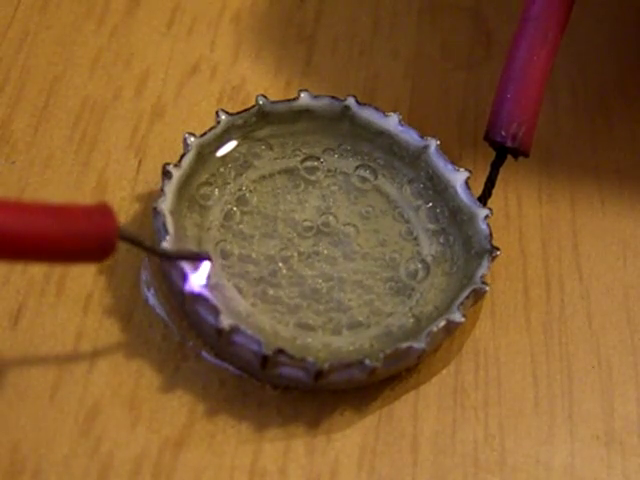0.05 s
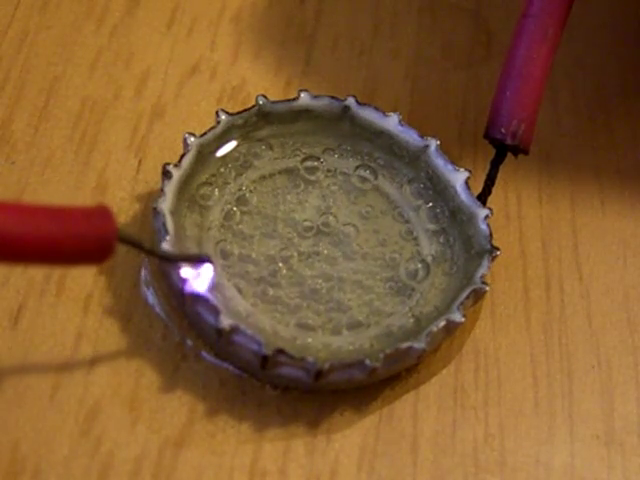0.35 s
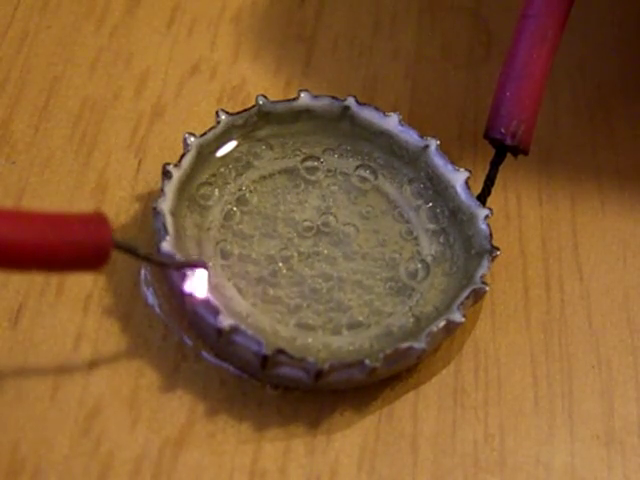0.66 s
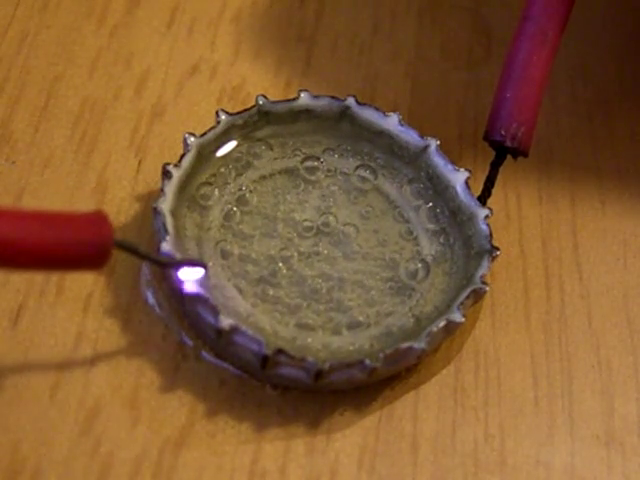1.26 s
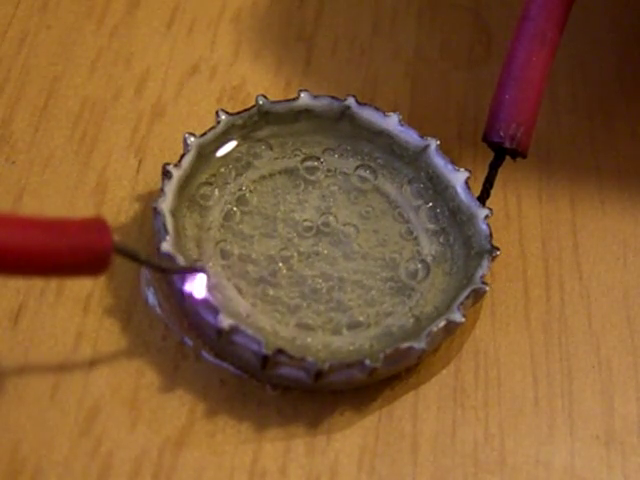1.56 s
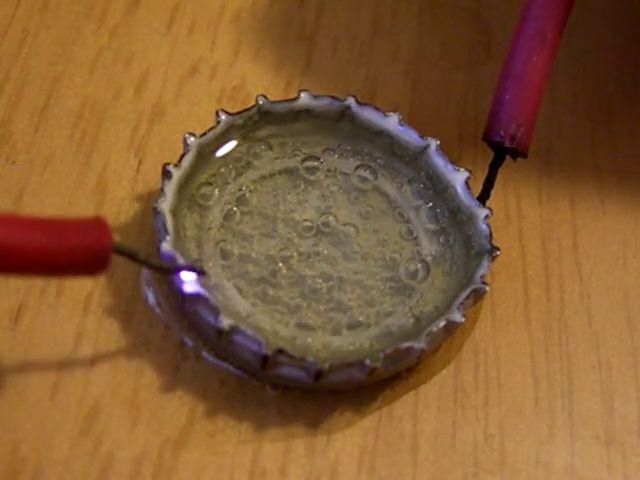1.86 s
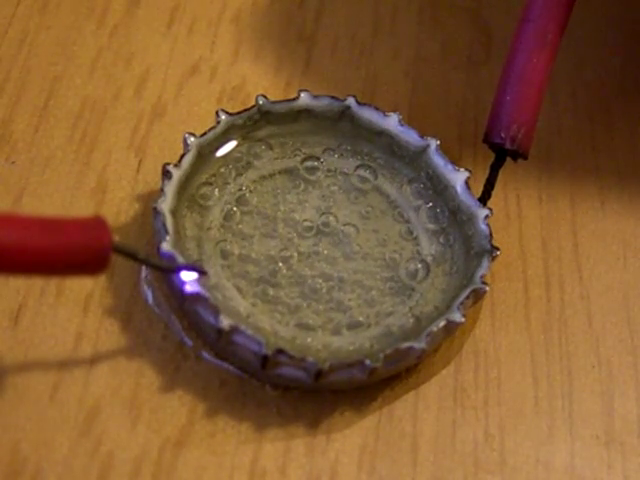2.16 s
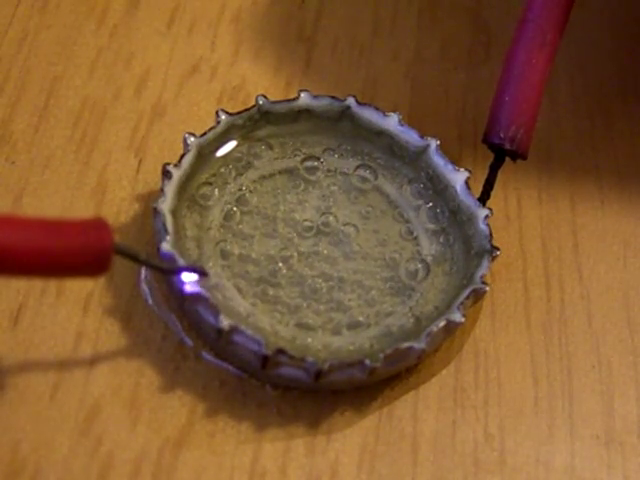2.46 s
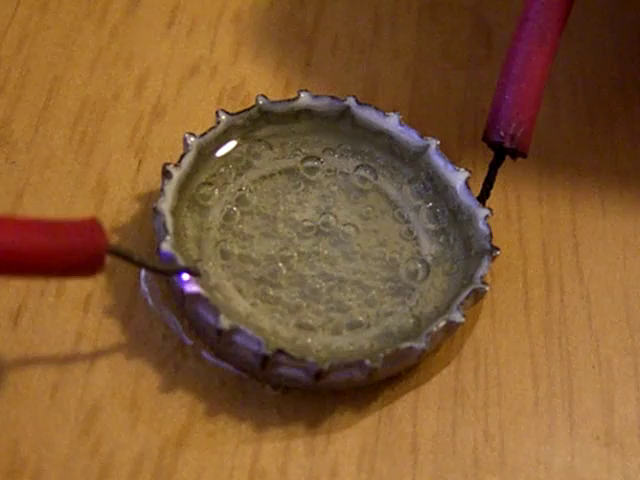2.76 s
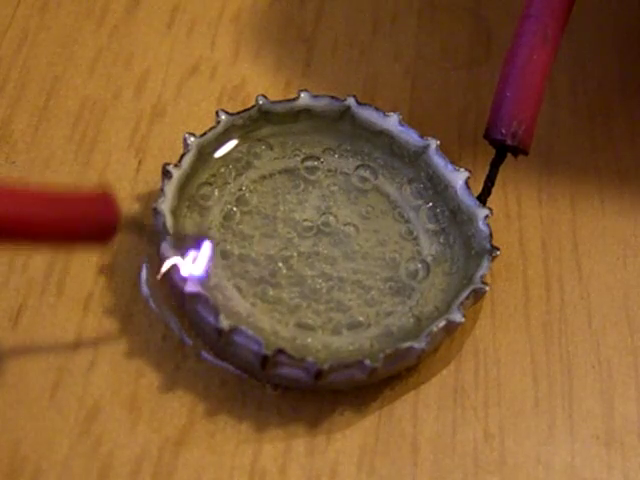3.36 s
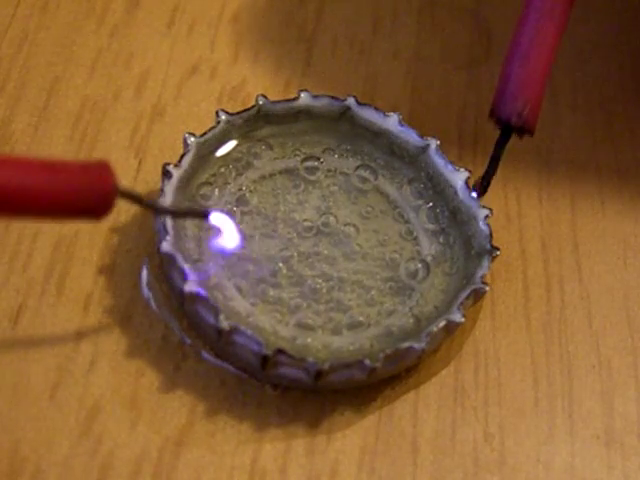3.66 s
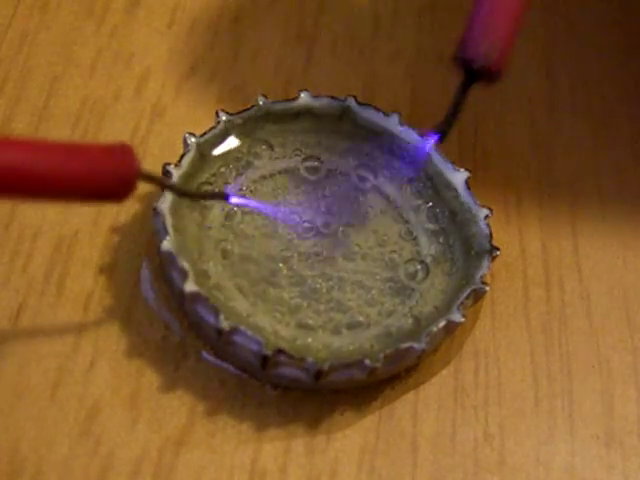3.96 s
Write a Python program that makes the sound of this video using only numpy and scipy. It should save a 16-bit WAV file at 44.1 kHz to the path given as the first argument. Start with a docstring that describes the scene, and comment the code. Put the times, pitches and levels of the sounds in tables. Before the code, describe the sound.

An electric arc sizzles and crackles with a high whine, briefly dying, then flaring up.

```python
"""A high-voltage arc burns from a wire into a liquid-filled bottle cap, close to the microphone.
The supply makes it whine near 11 kHz; whine, hiss and the liquid's sizzle throb with the rectified
mains. Whenever the arc restrikes it snaps, once per throb. It dies for a moment, leaving the thin
buzz of the supply, flares up with a squeal, and then a second gap at the rim spits dense sparks.
Low room noise and a faint hum sit underneath."""
import sys
import numpy as np
from scipy import signal
from scipy.fft import rfft, irfft
from scipy.io import wavfile
from scipy.ndimage import uniform_filter1d

SR = 44100
rng = np.random.default_rng(int(sys.argv[2]) if len(sys.argv) > 2 else 0)


def wav_out(sig):
    """Save sig, one row per channel (or a flat mono array), as 16-bit PCM at SR to the path in sys.argv[1]."""
    wavfile.write(sys.argv[1], SR, np.round(np.clip(np.atleast_2d(sig).T, -1, 1) * 32767).astype(np.int16))


N = 176400
T = np.arange(N) / SR
WHINE_HZ, THROB_HZ = 11370, 120

# Strength of the arc, riding whine and hiss. Each row: time in seconds, relative level in dB.
ARC_STRENGTH = [(0, -12), (.09, -10.5), (.108, -14), (.125, -12), (.33, -14.5), (.385, -17), (.43, -15),
                (.465, -18.5), (.495, -16.5), (.525, -21.5), (.59, -22), (.62, -18.5), (.66, -20),
                (.73, -17), (.98, -13), (1.25, -12), (1.28, -12.5), (1.296, -10), (1.31, -15), (1.325, -10),
                (1.34, -15), (1.355, -10.5), (1.383, -20.5), (1.42, -18), (1.52, -17.5), (1.605, -16),
                (1.62, -12.5), (1.635, -15.5), (2.08, -14.5), (2.16, -16), (2.41, -14), (2.61, -16),
                (2.647, -25.5), (2.69, -17), (2.75, -25), (2.81, -22), (2.845, -27.5), (2.89, -24.5),
                (2.94, -17), (2.983, -21), (3, -41.5), (3.287, -47), (3.295, -21), (3.306, -12),
                (3.345, -9), (3.39, -12), (3.445, -19), (3.49, -17), (3.53, -20.5), (3.61, -20.5),
                (3.66, -16.5), (3.775, -22), (3.81, -31), (3.83, -56), (3.9, -49), (4, -35)]
# Nearly white tone of the plasma. Each row: frequency in Hz, relative gain in dB.
HISS_EQ = [(20, 4), (50, 1), (150, 1), (1000, 0.5), (4000, 1), (9000, 0.5), (13000, 2.5), (17000, -2)]
# Fader for the liquid under the arc. Each row: time in seconds, level in dB.
SIZZLE_FADER = [(0, -36), (.42, -35), (.46, -37), (.68, -39), (.8, -29.5), (1.1, -32), (1.25, -28),
                (1.4, -35), (1.52, -27.5), (1.65, -31), (1.84, -28), (1.95, -32.5), (2.2, -34),
                (2.38, -31.5), (2.55, -34.5), (2.7, -30.5), (2.8, -39), (2.97, -29), (3.0, -77),
                (3.28, -80), (3.31, -26.5), (3.4, -26), (3.68, -30.5), (3.82, -57)]
# Bright, frying tone of the liquid's pops. Each row: frequency in Hz, relative gain in dB.
POP_EQ = [(100, -24), (2500, -23), (3300, -15.5), (5500, -22), (7000, -8.5), (8000, -7), (8600, -5),
          (9300, -0.5), (10500, -11), (11200, -6.5), (12000, 1.5), (12600, -15), (14100, -18), (14700, -6),
          (15700, -22), (17000, -18)]
# Fader for the room, dipping under the rim sparks. Each row: time in seconds, level in dB.
ROOM_FADER = [(0, -52.5), (3.68, -48), (3.82, -67), (4, -53)]
# Dark tone of the room. Each row: frequency in Hz, relative gain in dB.
ROOM_EQ = [(20, -6), (70, -16), (130, 0.5), (400, 0.5), (700, -8.5), (1500, -16), (6000, -19.5),
           (17000, -18)]
# Runs of restrikes, one snap per throb. Each row: first and last snap in seconds,
# relative snap level in dB, relative chirp level in dB.
RESTRIKE_RUNS = [(.1252, .1417, -13, -21), (.1584, .1584, -10, -19), (.175, .175, -15, -22),
                 (.1917, .1917, -9, -24), (.2082, .2249, -15, -19), (.2333, .2333, -10, -23),
                 (.2505, .2666, -12, -21), (.2837, .3166, -13, -25), (.3334, .3334, -7, -24),
                 (.3501, .3501, -8, -25), (.3673, .3748, -14, -22), (.4002, .4002, -12, -29),
                 (.417, .4334, -12, -21), (.4668, .4668, -21, -32), (.4916, .5161, -16, -29),
                 (.5503, .5503, -18, -26), (.567, .5835, -20, -29), (.608, .658, -18, -36),
                 (.6999, .7913, -15, -38), (.7998, .933, -13, -40), (1.2581, 1.2661, -17, -36),
                 (1.6915, 1.708, -16, -38), (1.7663, 1.7912, -19, -38), (1.8161, 1.858, -13, -45),
                 (2.3247, 2.333, -20, -42), (2.6088, 2.6088, -15, -40), (2.862, 2.862, -20, -45),
                 (3.3498, 3.3822, -10, -20), (3.3903, 3.4228, -6.5, -26), (3.4377, 3.46, -9, -19),
                 (3.4873, 3.4873, -10, -20), (3.5126, 3.5213, -8, -22), (3.5383, 3.555, -12, -24),
                 (3.5628, 3.6036, -7.5, -24), (3.6294, 3.6776, -14, -24)]
# Stretch of the arc. Each row: time in seconds, length from 0 (short) to 1 (drawn out over the liquid).
ARC_STRETCH = [(.3, 0.31), (.85, 0.47), (1.25, .05), (2.7, .05), (3.35, 0.96)]
# Tone of the snaps and ticks. Each row: frequency in Hz, relative gain in dB.
SNAP_EQ = [(30, -25), (1000, -20), (2600, -18), (3400, -9), (3750, -17), (4100, -9.5), (4600, -7.5),
           (4950, -14), (5250, -8.5), (5550, -30), (6200, -3.5), (6550, -10.5), (6800, -0.5), (7900, -0.5),
           (8400, 1.5), (8650, -10.5), (9050, -4), (9550, -8), (10300, -18), (11000, -17), (12000, -10),
           (12500, -20), (13800, -20), (14700, -2), (15700, -16), (17000, -10)]
# Extra ring on a short arc's snap. Each row: frequency in Hz, boost in dB at zero length.
SHORT_ARC_EQ = [(2600, 0), (8400, -2), (9500, 7.5), (10400, 5), (12000, 13), (14700, -2.5)]
# Fader for the long arc's squeal. Each row: time in seconds, relative level in dB.
SQUEAL_FADER = [(3.34, -37), (3.415, -30), (3.432, -23), (3.47, -21), (3.50, -21), (3.53, -24),
                (3.58, -25.5), (3.62, -23.5), (3.66, -23), (3.705, -38)]
# Volley at the rim. Each row: time in seconds, relative level in dB, base rate in sparks per second.
RIM_VOLLEY = [(3.695, -38, 1480), (3.697, -14.5, 2260), (3.77, -17.5, 1930), (3.79, -12.5, 900),
              (3.798, -13, 900), (3.8, -35, 1800), (3.84, -42, 3000), (3.89, -46.5, 3000),
              (3.93, -36.5, 3000), (4, -33, 3000)]
# Single cracks across the rim gap. Each row: time in seconds, level in dB before the EQ.
RIM_CRACKS = [(3.801, 3), (3.8023, 3), (3.8044, 5), (3.8068, 4), (3.8099, 3), (3.9808, 12.5), (3.9839, 9),
              (3.9856, 9), (3.9873, 7), (3.9886, 6), (3.9921, 4), (3.9937, 6), (3.9948, 7), (3.9963, 6)]
# Tone of the rim's sparks and cracks. Each row: frequency in Hz, relative gain in dB.
RIM_EQ = [(30, -23.5), (700, -25), (1600, -19), (2600, -15), (3300, -8.5), (3800, -16), (4550, -7.5),
          (4950, -21), (5250, -11.5), (5500, -29), (5850, -8), (6300, -10), (6550, -17), (6850, -5),
          (7400, -6), (8350, 2.5), (9400, -7.5), (9700, -4), (10300, -16.5), (11000, -10), (12200, -12.5),
          (13200, -11), (14700, -12), (15500, -24), (16300, -6), (17200, -28.5)]


def amp(db):
    """Decibels to gain."""
    return 10 ** (np.asarray(db) / 20)


def unit(x):
    """Scales to rms 1."""
    return x / np.sqrt(np.mean(x ** 2) + 1e-20)


def curve(rows, column=1):
    """An automation lane: one column of a table, joined by straight lines in time."""
    rows = np.array(rows)
    return np.interp(T, rows[:, 0], rows[:, column])


def wander(hz):
    """Smooth random modulation up to about the given rate."""
    rolloff = 1 + (np.fft.rfftfreq(N, 1 / SR) / hz) ** 4
    return unit(irfft(rfft(rng.standard_normal(N)) / rolloff, N))


def equalise(x, eq):
    """Minimum-phase EQ, scaled to unit energy."""
    eq_hz, eq_db = np.transpose(eq)
    hz = abs(np.fft.fftfreq(4096, 1 / SR))
    log_gain = np.log(amp(np.interp(np.log(hz + 1), np.log(eq_hz + 1), eq_db)))
    ring = np.fft.ifft(np.exp(np.conj(signal.hilbert(log_gain)))).real[:len(hz) // 2]
    return signal.oaconvolve(x, ring / np.linalg.norm(ring))[:N]


def throb(depth, crest=.46):
    """The current swells with each half wave of the mains; crest is the peak's place in that cycle."""
    return 1 + depth * np.cos(2 * np.pi * (THROB_HZ * T - crest))


def add(mix, s, sound):
    """Mixes a sound in at s seconds."""
    part = mix[max(round(s * SR), 0):][:len(sound)]
    part += sound[:len(part)]


def whine(drift_hz=1.35, flutter_db=.5, trim_db=1.25):
    """The supply's switching tone sings in the arc, swelling and bending with each throb."""
    mains = 2 * np.pi * THROB_HZ * T
    phase = 2 * np.pi * np.cumsum(WHINE_HZ + drift_hz * wander(3.1)) / SR
    bend = .38 * np.cos(mains - .76) + .08 * np.cos(2 * mains - .56)
    level = amp(curve(ARC_STRENGTH) + trim_db + flutter_db * wander(390))
    return level * unit(throb(.45) * np.sin(phase + bend))


def hiss(follow=.78, trim_db=-19):
    """White hiss of the plasma, following the arc's strength."""
    noise = rng.standard_normal(N) * unit(throb(.39))
    return amp(trim_db + follow * curve(ARC_STRENGTH)) * equalise(noise, HISS_EQ)


def sizzle(pops_per_s=3500, pop_spread_db=10.5, tick_spread_db=9, tick_db=-9.5):
    """The liquid fries in tiny pops that crowd on each crest; the current ticks each time it resumes."""
    fires = rng.random(N) < pops_per_s * throb(.6) / SR
    polarity = rng.choice([-1, 1], N)
    pops = fires * polarity * amp(pop_spread_db * np.minimum(rng.standard_normal(N), 2))
    ticks = np.zeros(N)
    for cycle, (late, size) in enumerate(rng.standard_normal((N * THROB_HZ // SR, 2))):
        add(ticks, (cycle + .92 + .03 * late) / THROB_HZ, amp([tick_spread_db * min(size, 2)]))
    frying = equalise(unit(pops), POP_EQ)
    ticking = amp(tick_db) * equalise(unit(ticks), SNAP_EQ)
    return amp(curve(SIZZLE_FADER)) * (frying + ticking)


def room(hum_db=-62):
    """A bed of low room noise and faint mains hum."""
    level = amp(curve(ROOM_FADER))
    hum = amp(hum_db) * unit(level * np.sin(2 * np.pi * THROB_HZ * T))
    return level * equalise(rng.standard_normal(N), ROOM_EQ) + hum


def chirp(t, low_hz=5920, high_hz=17030, rise_s=.001):
    """The two-tone squeak that leads into a snap, tuned a little differently each time."""
    detune = rng.standard_normal()
    low = np.sin(2 * np.pi * (low_hz + 45 * detune) * t)
    high = amp(-2) * np.sin(2 * np.pi * (high_hz - 220 * detune) * t)
    swell = t / rise_s * np.exp(1 - t / rise_s)
    return swell * (low + high)


def snap_eq(length):
    """The shorter the arc, the shriller its snap."""
    return [(hz, db + (1 - length) * np.interp(hz, *np.transpose(SHORT_ARC_EQ))) for hz, db in SNAP_EQ]


def restrikes(count=7, spark_hz=3880, snap_trim_db=17, chirp_trim_db=4, chirp_lead_s=.0016):
    """Each restrike chirps and snaps in a train of sparks: ragged if the arc is short, pitched if long."""
    out = np.zeros(N)
    lengths = np.clip(curve(ARC_STRETCH), 0, 1)
    order = np.arange(count)
    t = np.arange(SR // 100) / SR
    for first, last, snap_db, chirp_db in RESTRIKE_RUNS:
        length = lengths[round(first * SR)]
        spark = equalise(1. * (t == 0), snap_eq(length))[:len(t)]
        evenness = .6 * length ** 2  # steadies the sparks' timing and polarity
        fade = amp(-11 * (1 - length) * order / count)
        for s in np.linspace(first, last, round((last - first) * THROB_HZ) + 1):
            add(out, s - chirp_lead_s, amp(chirp_db + chirp_trim_db) * chirp(t))
            late, flip = rng.random((2, count))
            onsets = (order + (1 - evenness) * late) / spark_hz
            polarity = np.sign((1 + evenness) / 2 - flip)
            snap = np.zeros(len(t))
            for onset, gain in zip(onsets, fade * polarity):
                add(snap, onset, gain * spark)
            add(out, s - onsets.mean(), amp(snap_db + snap_trim_db) * snap / np.linalg.norm(snap))
    return out


def echoes(x, wet_db=-14, t60_s=.042):
    """Short scatter from the table and things nearby."""
    t = np.arange(SR // 5) / SR
    tail = rng.standard_normal(len(t)) * amp(-60 * t / t60_s) * (t > .001)
    return x + amp(wet_db) * signal.oaconvolve(x, tail / np.linalg.norm(tail))[:N]


def arc_out(start_s=2.992, end_s=3.293):
    """A quick crossfade: 1 while the arc is out, 0 while it burns."""
    return uniform_filter1d(1. * (T > start_s) * (T < end_s), size=200)


def idle_supply(pitch_hz=11390, level_db=-35.5, ring_hz=10100, ring_s=.0012):
    """With no arc the thin whine drops out once per throb, so it buzzes and the transformer rings."""
    offset = (THROB_HZ * T - .13 + .5) % 1 - .5  # from the nearest dropout, in throbs
    dropout = np.exp(-abs(offset) / .026)
    bend = .81 * np.cos(2 * np.pi * THROB_HZ * T + .88) - 3 * dropout * np.sign(offset)
    buzz = unit(throb(.38) * (1 - dropout) * np.sin(2 * np.pi * pitch_hz * T + bend))
    since_s = offset % 1 / THROB_HZ
    ring_phase = 2 * np.pi * (pitch_hz * T + (ring_hz - pitch_hz) * since_s)
    ring = amp(-7) * np.exp(-since_s / ring_s) * np.sin(ring_phase)
    return amp(level_db) * (buzz + ring)


def squeal(waver_hz=70, high_db=4):
    """The long arc fires unevenly on alternate cycles: shaky tones near 1/2 and 3/2 of the whine."""
    slip = 2 * np.pi * np.cumsum(waver_hz * (wander(300) + 1.1)) / SR
    half_phase = np.pi * WHINE_HZ * T
    low = np.sin(half_phase + slip)
    high = amp(high_db) * np.sin(3 * half_phase + slip / 2 + .7 * wander(120))
    gate = (T > SQUEAL_FADER[0][0]) * (T < SQUEAL_FADER[-1][0])
    return amp(curve(SQUEAL_FADER)) * gate * throb(.27) * (low + high)


def rim_sparks(unevenness=.65, spread_db=2.5, spark_s=.00045):
    """The second gap breaks down in tiny noise bursts, fastest on each crest, and single loud cracks."""
    base_rate = curve(RIM_VOLLEY, column=2)
    rate = np.maximum(base_rate * throb(.38) * (1 + unevenness * wander(900)), 0)
    charge = np.cumsum(rate) / SR
    fires = np.diff(np.floor(charge), prepend=0)  # one spark each time the charge fills up
    clicks = fires * amp(spread_db * rng.standard_normal(N)) * np.sqrt(SR / base_rate)
    level = amp(curve(RIM_VOLLEY)) * (T > RIM_VOLLEY[0][0])
    decay = np.exp(-1 / (spark_s * SR))
    power = signal.lfilter([1 - decay], [1, -decay], (clicks * level) ** 2)
    sparks = np.sqrt(power) * rng.standard_normal(N)
    for s, db in RIM_CRACKS:
        add(sparks, s, amp([db]))
    return equalise(sparks, RIM_EQ)


def scene():
    """The mono mix; only the restrikes and rim sparks feed the echoes."""
    unlit = arc_out()
    tones = whine() * (1 - unlit) + idle_supply() * unlit + squeal()
    return (tones + hiss() + sizzle() + echoes(restrikes() + rim_sparks()) + room())[None]


def record(dry, ceiling=.9, cutoff_hz=17250):
    """Soft overload on the sharpest snaps, then a steep low-pass."""
    clipped = dry / (1 + (dry / ceiling) ** 6) ** (1 / 6)
    lowpass = signal.firwin(511, cutoff_hz, window=("kaiser", 9), fs=SR)
    return signal.oaconvolve(clipped, lowpass[None], "same")


dry = scene()
out = record(dry)
wav_out(out)
```